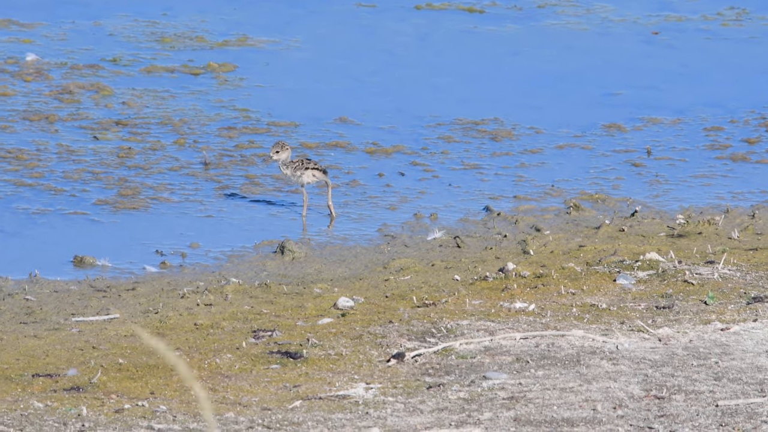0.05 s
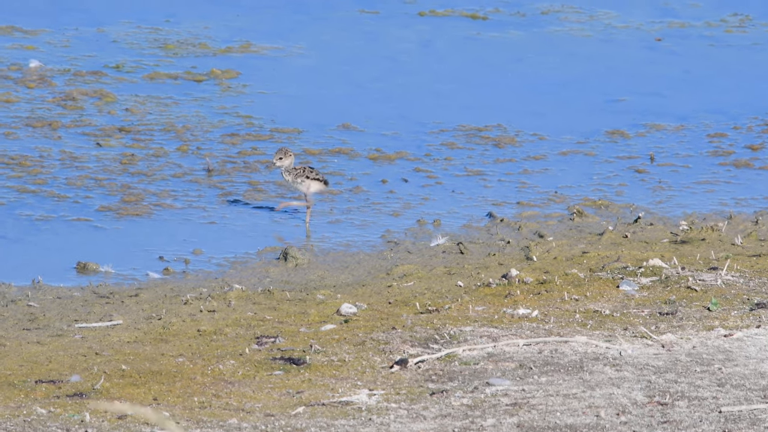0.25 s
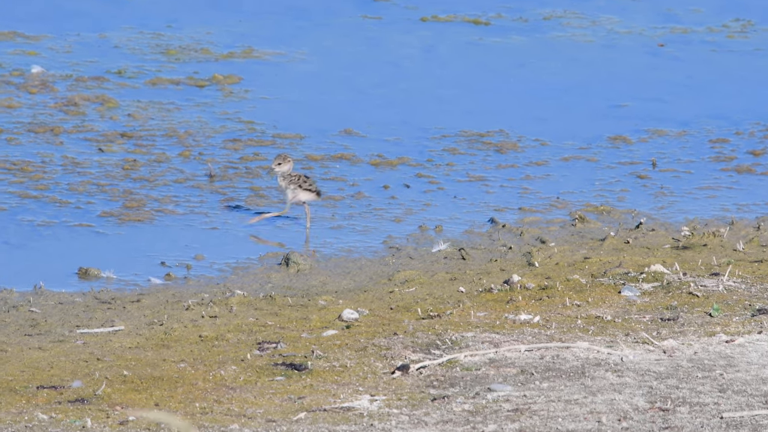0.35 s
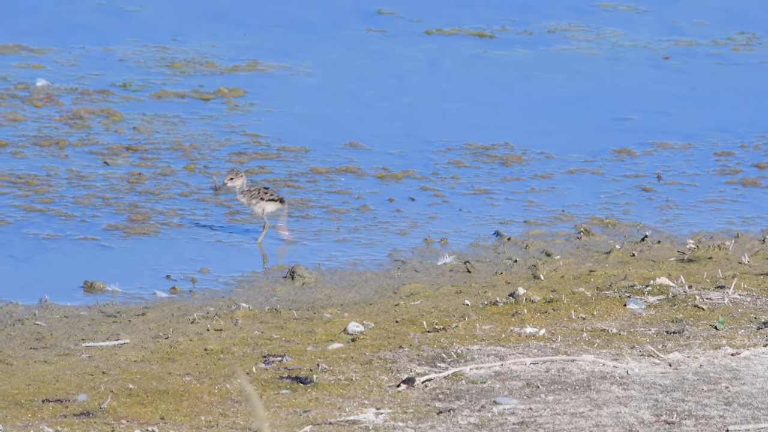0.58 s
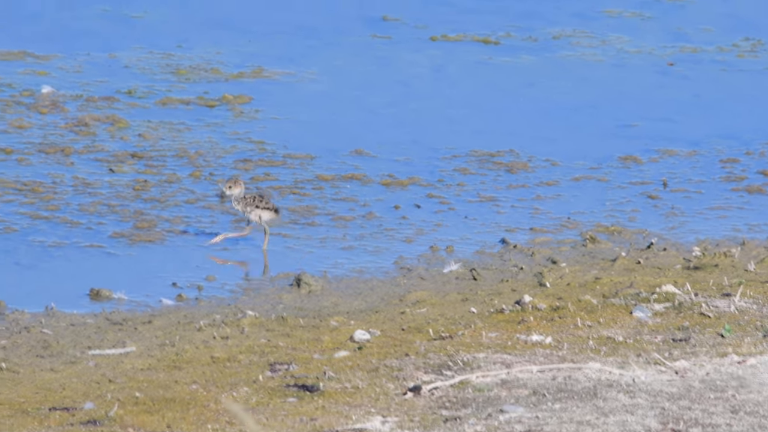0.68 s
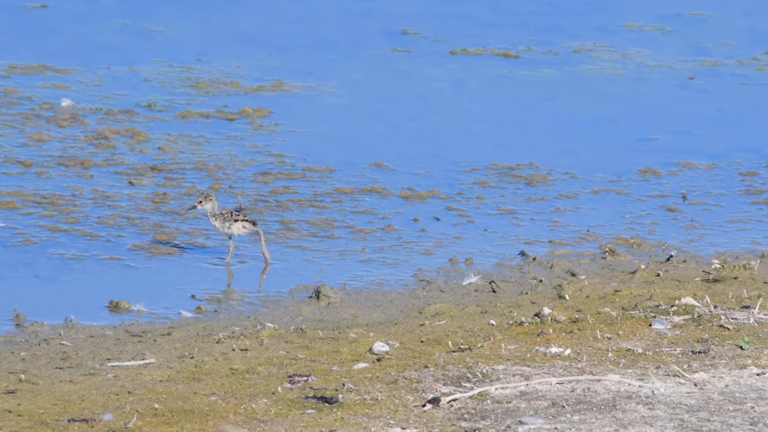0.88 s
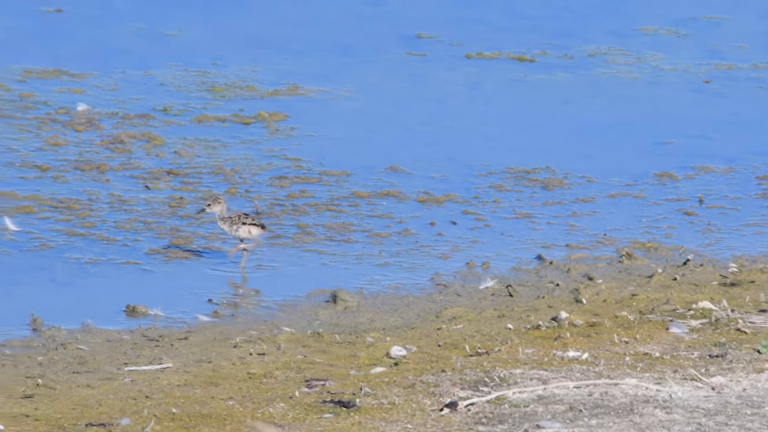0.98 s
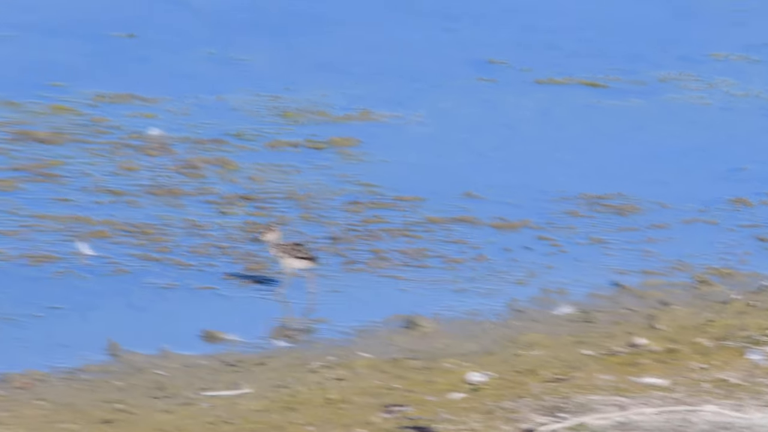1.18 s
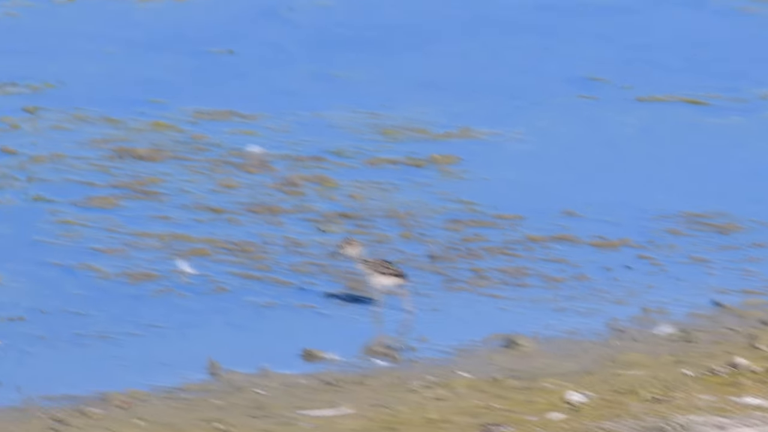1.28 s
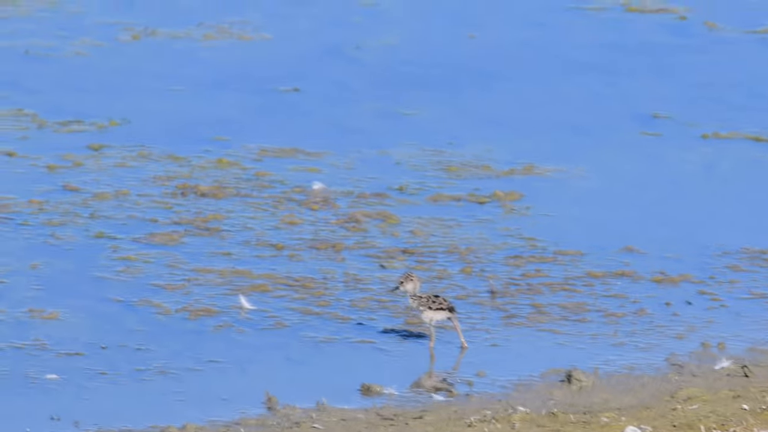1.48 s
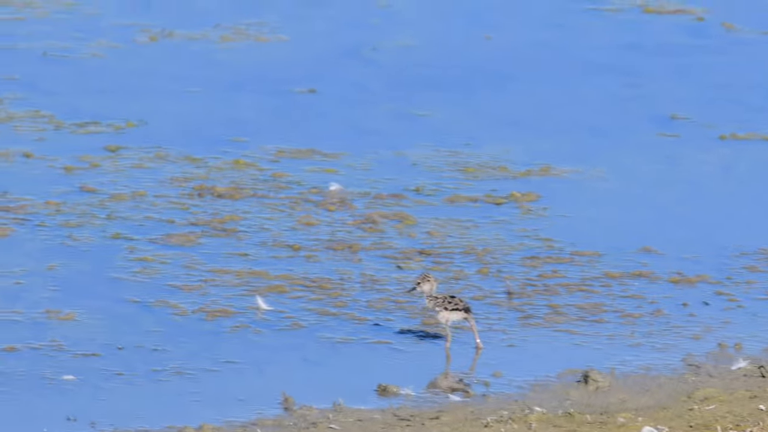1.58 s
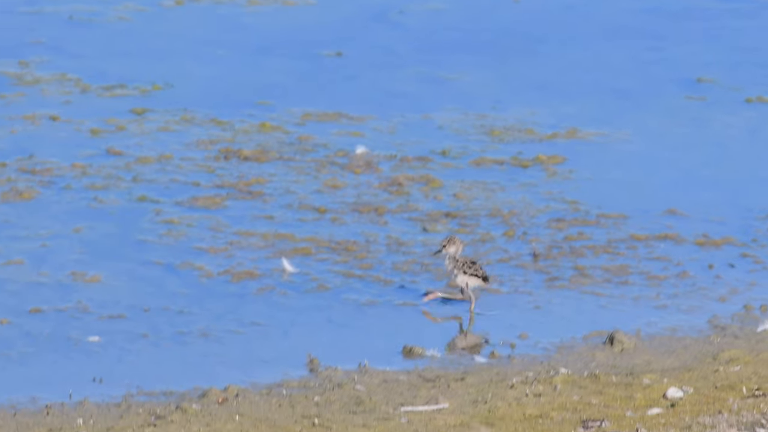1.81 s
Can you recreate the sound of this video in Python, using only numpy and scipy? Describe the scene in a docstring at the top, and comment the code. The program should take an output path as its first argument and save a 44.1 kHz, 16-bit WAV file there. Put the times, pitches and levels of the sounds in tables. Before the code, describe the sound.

Two wading birds yap sharply and rapidly, with light wind buffeting the microphone.

```python
"""At the edge of shallow water, on a hand-held camera's stereo microphone: two stilts yap in alarm,
with fainter birds farther off. Each yap starts hoarse, slides up and clears into a bright harmonic
tone that the banks and water scatter. Up close, wind buffets the two microphone ports and the camera
clicks and whines faintly over a soft open-air hiss. Its filters cut two narrow bands and the top."""
import sys
import numpy as np
from scipy import signal
from scipy.fft import rfft, irfft
from scipy.io import wavfile

SR = 44100
rng = np.random.default_rng(int(sys.argv[2]) if len(sys.argv) > 2 else 0)


def wav_out(sig):
    """Save sig, one row per channel (or a flat mono array), as 16-bit PCM at SR to the path in sys.argv[1]."""
    wavfile.write(sys.argv[1], SR, np.round(np.clip(np.atleast_2d(sig).T, -1, 1) * 32767).astype(np.int16))


N = 81585

# Yaps of the higher stilt, the lower stilt and the distant birds, mostly right of centre.
# Each row: start in seconds, length in seconds, top pitch in Hz, share of that pitch climbed,
# level in dB, left minus right in dB.
HIGH_STILT_YAPS = [(.196, .042, 1197, .22, -28.2, -2), (.452, .04, 1183, .24, -28.2, -1.5),
                   (.761, .041, 1215, .28, -29.6, -1), (1.105, .042, 1235, .3, -29.4, -1),
                   (1.468, .034, 1290, .24, -27.2, -6)]
LOW_STILT_YAPS = [(.507, .038, 1013, .3, -30.2, -5), (.93, .037, 1165, .38, -29, -4),
                  (1.179, .039, 1057, .3, -31.2, -2), (1.439, .037, 1187, .42, -29.8, -3),
                  (1.678, .038, 999, .22, -31, -7)]
DISTANT_YAPS = [(-.025, 0.056, 1192, 0.4, -69, -13.5), (.295, 0.026, 976, .1, -56.5, 0),
                (.36, 0.024, 1103, 0.19, -55.5, -1), (.555, 0.028, 1050, 0.18, -55.5, -2),
                (.625, .035, 1000, .2, -59, -3), (.685, .03, 1006, 0.18, -59.5, -1)]
# Throat and bill resonances of each voice, then the breath noise. Each row: frequency in Hz, gain in dB.
HIGH_STILT_THROAT = [(1200, -11), (1700, -15), (2120, -3.5), (2400, -23), (3000, -5.5), (3550, 1.5),
                     (4850, 0), (5950, -2), (7100, -13.5), (8400, -31.5), (9700, -16.5), (10900, -24),
                     (12200, -36), (15500, -52)]
LOW_STILT_THROAT = [(1000, -15.5), (2050, -9), (3100, -7.5), (4050, -2), (4650, 5.5), (5150, -1),
                    (6050, -15), (7000, -35), (8200, -23), (9200, -3.5), (10400, -27.5), (12000, -44),
                    (15500, -42)]
DISTANT_THROAT = [(1000, -31), (1950, 6.5), (3000, -24.5), (3700, -3), (5200, -16.5), (7000, 1),
                  (12000, -56)]
BREATH_SPECTRUM = [(900, -12.5), (1500, -8), (2000, 5), (3000, -6), (4000, 0), (5000, -7.5), (6200, -18.5),
                   (7200, -29.5), (9400, -19), (12000, -38), (15500, -42)]
# Swell and fall of one yap. Each row: time as a share of its length, gain in dB.
YAP_ENVELOPE = [(-.2, -41), (0, -24.5), (.22, -13), (.42, -4.5), (.66, -1.5), (.84, -1.65), (1, -19),
                (1.16, -43)]


def bird(yaps, throat, breath_db, right_lag_s):
    """Rising harmonic yaps through fixed throat resonances; the hoarse start settles into a clean tone."""
    hoarse_share, hoarse_jitter, clear_jitter, hoarse_breath_db = .25, .055, .006, .5
    out, t = np.zeros((2, N)), np.arange(N) / SR
    jitter, breath = wander(900), coloured_noise(BREATH_SPECTRUM)
    shares, envelope_db = np.array(YAP_ENVELOPE).T
    harmonic = np.arange(1, 16)[:, None]
    for start, length, top_hz, climb, db, pan_db in yaps:
        progress = (t - start) / length
        span = np.flatnonzero((progress > shares[0]) & (progress < shares[-1]))
        progress = progress[span]
        hoarse = np.exp(-(np.maximum(progress, 0) / hoarse_share) ** 4)
        hz = top_hz * (1 - climb * np.clip(1 - progress, 0, 1) ** 2.897)  # climbs fast, then levels off
        hz *= 1 + (clear_jitter + hoarse_jitter * hoarse) * jitter[span]
        phase = 2 * np.pi * np.cumsum(hz) / SR
        gains = gain_at(harmonic * hz, throat) * (harmonic * hz < TOP_HZ)
        tone = unit((gains * np.sin(harmonic * phase + harmonic ** 2)).sum(0)) * (1 - hoarse / 2)
        breath_gain = undb(breath_db) + undb(hoarse_breath_db) * hoarse
        hiss = breath_gain * breath[span] * (1 + np.cos(phase))  # pulses with each cycle of the tone
        envelope = undb(db + np.interp(progress, shares, envelope_db))
        out[:, span] += pan((tone + hiss) * envelope, pan_db)
    delay = np.exp(-2j * np.pi * np.fft.rfftfreq(N, 1 / SR) * right_lag_s)
    return np.array([out[0], irfft(rfft(out[1]) * delay, N)])


# Clear bird notes from far off, dead centre.
# Each row: middle in seconds, half length in seconds, top pitch in Hz, peak level in dB.
DISTANT_NOTES = [(0.239, 0.017, 1976, -45.5), (.31, 0.011, 1950, -55.5), (1.575, 0.0744, 1056, -63),
                 (1.812, 0.015, 2400, -60.5), (1.815, .013, 3610, -60)]


def distant_notes():
    """Far birds sing faint pure notes whose pitch arches up and down."""
    out, t = np.zeros(N), np.arange(N) / SR
    for at, half, top_hz, db in DISTANT_NOTES:
        away = ((t - at) / half) ** 2
        hz = top_hz * (1 - .025 * np.minimum(away, 2))
        out += undb(db) * np.exp(-away ** 2) * np.sin(2 * np.pi * np.cumsum(hz) / SR)
    return out


def shore(calls):
    """Banks and water scatter a short tail and a faint long one back to the microphone."""
    t, delay_s = np.arange(N) / SR, .0051

    def tail(db, t60_s):
        return undb(db) * unit(noise() * undb(-60 * t / t60_s) * (t > delay_s)) / np.sqrt(N)

    echoes = [signal.fftconvolve(side, tail(-19.5, t60_s=.088) + tail(-36.5, t60_s=.96)) for side in calls]
    return calls + np.array(echoes)[:, :N]


# Eddies right at the microphone ports.
# Each row: middle in seconds, half length in seconds, level in dB, left minus right in dB.
EDDIES = [(0.056, 0.013, -45, -8.5), (0.135, 0.017, -36.5, 5.5), (0.192, .03, -40, -11),
          (0.246, 0.011, -31.5, -18), (0.282, 0.016, -33, 0), (0.337, 0.017, -30, 15),
          (0.395, 0.012, -28, -18.5), (0.431, 0.012, -28, -18), (0.482, 0.025, -45, -9),
          (0.838, 0.026, -46.5, -23), (0.908, 0.013, -42, -16.5), (.97, 0.033, -51, 4),
          (1.068, 0.03, -43.5, -13.5), (1.21, 0.019, -47.5, 1), (1.402, 0.013, -42, -19),
          (1.463, 0.032, -37.5, -19), (1.526, 0.01, -32, -18.5), (1.561, 0.023, -35.5, 19),
          (1.643, 0.03, -42.5, -10), (1.7, 0.011, -39.5, -23.5), (1.746, 0.024, -41, 2.5)]
# Sharp pressure thumps, mostly on one port. Each row: middle in seconds, half length in seconds,
# pitch in Hz, level in dB, left minus right in dB.
PORT_THUMPS = [(.409, .008, 165, -21.5, -22), (.6915, .003, 235, -24, -22), (.698, .007, 115, -31, -20),
               (1.049, .009, 85, -31, -22), (1.4345, .0052, 120, -18.5, -21), (1.5415, .004, 130, -26, 20),
               (1.567, .0028, 200, -23.5, 20), (.098, .007, 105, -34, 5)]
# Rumble of an eddy, turbulence inside a thump, and the breeze. Each row: frequency in Hz, gain in dB.
EDDY_SPECTRUM = [(20, -11.5), (45, -6.5), (90, 0), (180, -4), (300, -12.5), (450, -25), (800, -38.5),
                 (2000, -82)]
CHURN_SPECTRUM = [(30, -8.5), (120, -5.5), (300, 0.5), (450, -13.5), (700, -29.5), (2000, -68)]
BREEZE_SPECTRUM = [(20, -11), (55, 3), (100, -5.5), (200, -23), (400, -12), (1000, -34)]


def wind():
    """Eddies rumble on each port separately over a light breeze; the hardest land as single thumps."""
    octaves_per_db, reference_db = .061, -30.5
    t = np.arange(N) / SR
    out = undb(-56.5) * np.array([coloured_noise(BREEZE_SPECTRUM) for port in range(2)])
    for at, half, db, pan_db in EDDIES:
        swell = np.exp(-((t - at) / half) ** 2 / 2)
        shift = 2 ** (octaves_per_db * (db - reference_db))  # stronger eddies reach higher
        eddy = np.array([unit(swell * coloured_noise(EDDY_SPECTRUM, shift)) for port in range(2)])
        out += pan(eddy * np.sqrt(np.mean(swell ** 2)) * undb(db), pan_db)
    churn = coloured_noise(CHURN_SPECTRUM)
    for at, half, hz, db, pan_db in PORT_THUMPS:
        push = np.sin(2 * np.pi * hz * (t - at)) + .16 * churn
        out += pan(undb(db) * np.exp(-((t - at) / half) ** 2) * push, pan_db)
    return out


# Clicks of the camera in the hand. Each row: start in seconds, level in dB.
CAMERA_CLICKS = [(.8105, -35), (0.8167, -45), (0.82, -44), (0.8345, -32), (0.9128, -35), (0.9192, -41.5),
                 (.922, -46), (0.978, -49), (1.0, -42), (1.0034, -34.5), (1.114, -34), (1.1404, -34),
                 (1.2132, -31.5), (1.2203, -51), (1.2236, -36.5), (1.276, -48), (1.2876, -42),
                 (1.3003, -45), (1.3032, -32)]
# Resonances of its body. Each row: frequency in Hz, gain in dB.
BODY_SPECTRUM = [(1500, -16), (3500, -14.5), (4450, -2), (5300, -7.5), (6050, 6), (7200, -15.5), (9100, -3),
                 (10500, -16.5), (12300, -17.5), (15000, -25.5)]


def camera_clicks():
    """Tiny snaps ring the camera's plastic body, louder at the right port."""
    decay_s, trim_db = .0009, 1
    out, t = np.zeros(N), np.arange(N) / SR
    ring = coloured_noise(BODY_SPECTRUM)
    for start, db in CAMERA_CLICKS:
        age = np.maximum(t - start, 0) / decay_s
        snap = ring * np.sqrt(age) * np.exp(-age)
        out += undb(db + trim_db) * snap / np.abs(snap).max()
    return pan(out, -6.5)


# The camera's whine, close to the microphone. Each row: pitch in Hz, level in dB.
WHINE_TONES = [(457.6, -66.5), (871.5, -64), (916.5, -65), (1008, -68.5), (1468, -73.5)]


def camera_whine():
    """The camera gives off a few thin tones, each wavering slightly in pitch."""
    out = np.zeros(N)
    for centre_hz, db in WHINE_TONES:
        hz = centre_hz * (1 + .00189 * wander(9.2))
        out += undb(db) * unit(np.sin(2 * np.pi * np.cumsum(hz) / SR))
    return out


# Outdoor air all around the microphone. Each row: frequency in Hz, gain in dB.
AIR_SPECTRUM = [(30, 12), (200, 4), (450, -0.5), (700, -1.5), (1100, -4), (1600, -6), (2300, -11.5),
                (3500, -18.5), (5200, -13.5), (7000, -25.5), (10000, -27.5), (15500, -55)]


def open_air():
    """A soft, wide hiss whose level flickers."""
    flicker_db, width = 2.2, .67
    mid, side = (coloured_noise(AIR_SPECTRUM) * undb(flicker_db * wander(45)) for _ in range(2))
    return undb(-55.5) * np.array([mid + width * side, mid - width * side])


def undb(db):
    """Decibels to gain."""
    return 10 ** (np.asarray(db) / 20)


def unit(x):
    """Scale to rms 1."""
    return x / np.sqrt(np.mean(x ** 2) + 1e-20)


def gain_at(hz, curve):
    """Gain of a (Hz, dB) curve."""
    curve_hz, db = np.array(curve).T
    return undb(np.interp(np.log(np.maximum(hz, 1)), np.log(curve_hz), db))


def noise():
    """White noise."""
    return rng.standard_normal(N)


def coloured_noise(curve, shift=1):
    """Noise of rms 1 shaped by a (Hz, dB) curve, its frequencies multiplied by shift."""
    return unit(irfft(rfft(noise()) * gain_at(np.fft.rfftfreq(N, 1 / SR) / shift, curve), N))


def wander(hz):
    """Smooth random drift below a rate, rms 1."""
    return unit(irfft(rfft(noise()) * np.exp(-(np.fft.rfftfreq(N, 1 / SR) / hz) ** 2), N))


def pan(x, db):
    """Place a sound by its level difference, left minus right."""
    return x * undb(np.array([[db], [-db]]) / 2)


def scene():
    """Birds across the water, wind and camera sounds at the microphone, open air behind."""
    calls = bird(HIGH_STILT_YAPS, HIGH_STILT_THROAT, breath_db=-25, right_lag_s=.000068)
    calls += bird(LOW_STILT_YAPS, LOW_STILT_THROAT, breath_db=-22, right_lag_s=.00017)
    calls += bird(DISTANT_YAPS, DISTANT_THROAT, breath_db=-2, right_lag_s=.00005)
    calls += distant_notes()
    return shore(calls) + camera_clicks() + wind() + pan(open_air() + camera_whine(), -2.5)


TOP_HZ = 15800  # upper edge of the camera's sound
# Bands the camera cuts from the microphone signal. Each row: centre in Hz, width in Hz.
CAMERA_NOTCHES = [(2640, 340), (7750, 860)]


def record(dry):
    """The camera notches out two narrow bands and cuts the top."""
    for hz, width in CAMERA_NOTCHES:
        notch = signal.butter(3, [hz - width / 2, hz + width / 2], "bandstop", fs=SR, output="sos")
        dry = signal.sosfilt(notch, dry)
    return signal.sosfilt(signal.ellip(10, .2, 80, TOP_HZ, fs=SR, output="sos"), dry)


dry = scene()
out = record(dry)
wav_out(out)
```